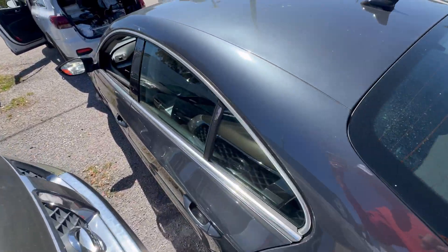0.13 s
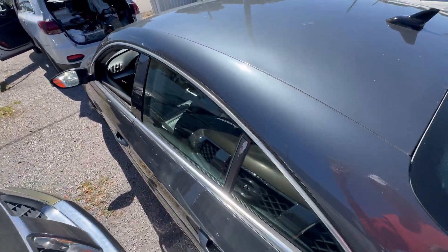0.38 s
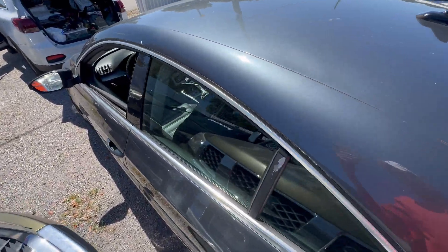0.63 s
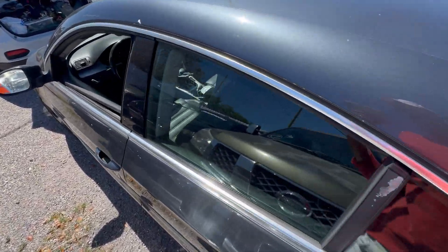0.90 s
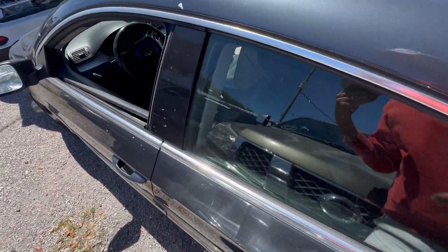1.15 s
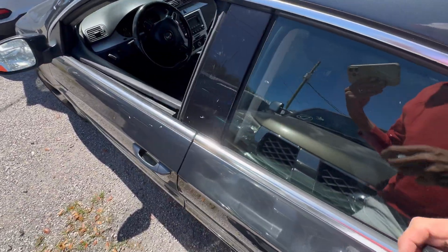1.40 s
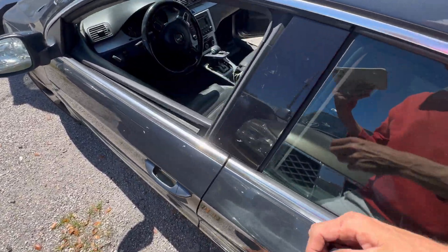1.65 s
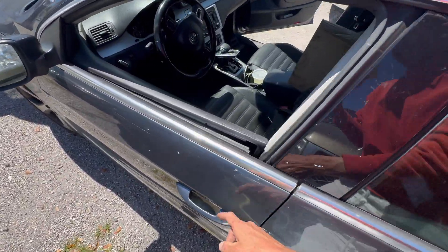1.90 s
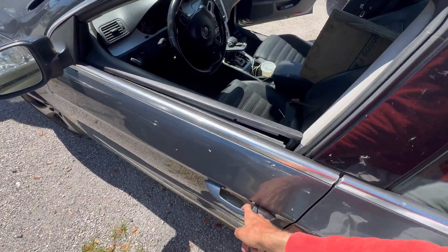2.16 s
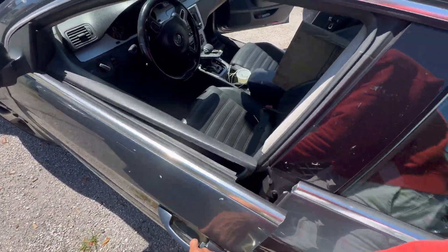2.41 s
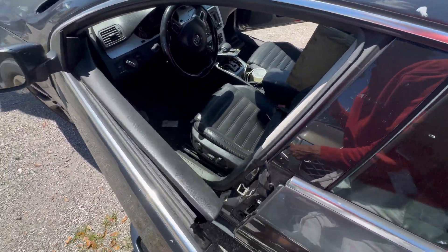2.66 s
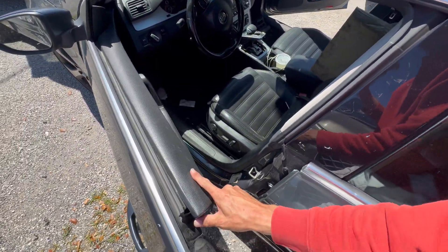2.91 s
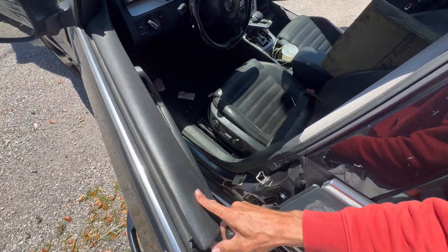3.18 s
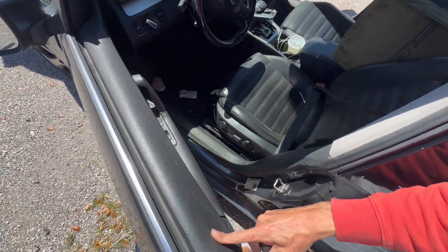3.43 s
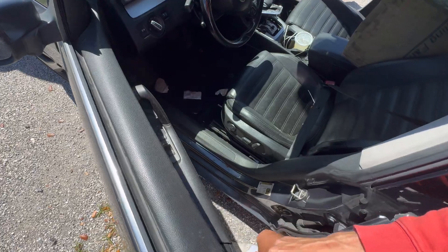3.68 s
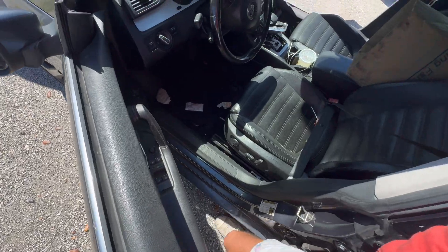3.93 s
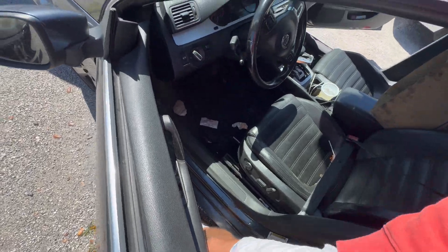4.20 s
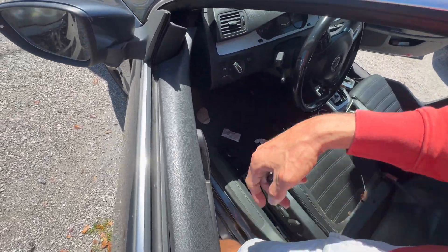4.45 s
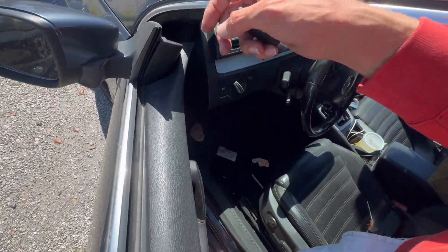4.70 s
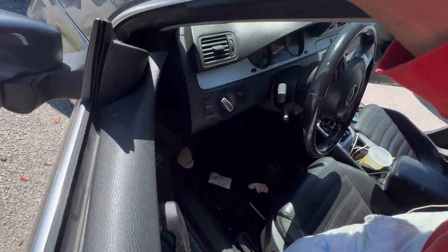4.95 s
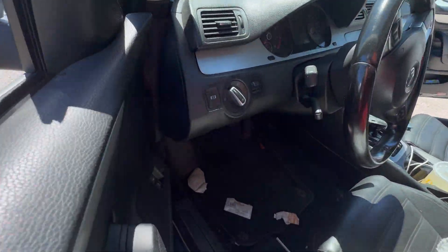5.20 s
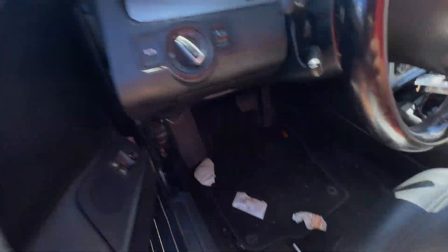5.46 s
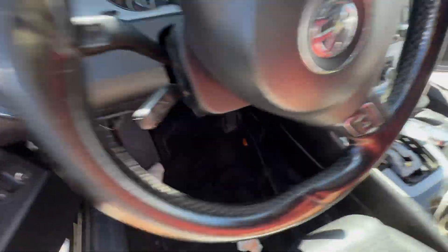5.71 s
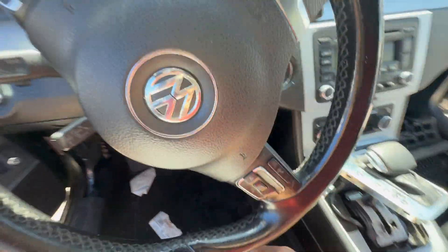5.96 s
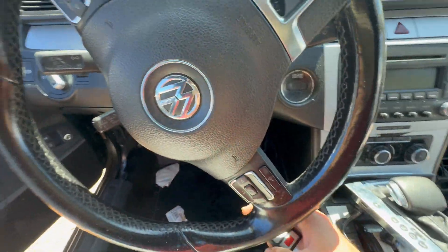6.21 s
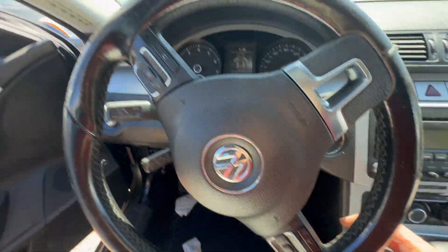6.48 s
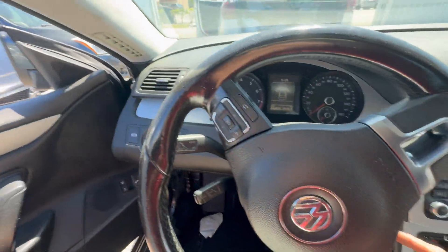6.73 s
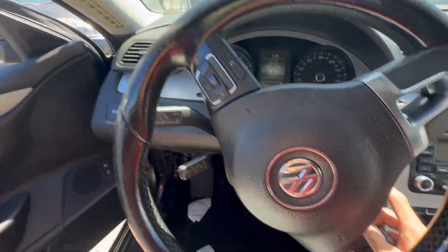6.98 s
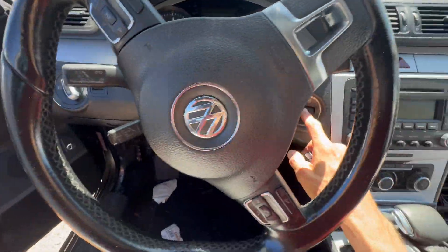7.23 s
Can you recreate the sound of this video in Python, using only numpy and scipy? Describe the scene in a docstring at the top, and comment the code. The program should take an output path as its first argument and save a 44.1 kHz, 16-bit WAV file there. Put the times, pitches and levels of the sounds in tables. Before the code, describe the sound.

A person steps over gravel with quiet crunches, fumbles at a car door handle, and pulls it open with bright metallic clicks and a solid hollow knock. More thumps of door and trim come unevenly, then clothing drags, leather rustles and the body lands in the seat. Low wind buffeting swells afterwards, with a few soft bumps and a final tiny click. Short echoes, close stereo pickup.

```python
"""A car door close to a hand-held stereo microphone: a person walks over gravel, pulls the handle, opens the door and
drops into the seat. Latch, panel and trim knock, tap and tick as decaying partials and noise cracks; the catch grinds
as noise through resonances. Shoes, clothes and seat rustle and drag as clumped grains, and a sleeve brushes mostly
the right port. Filtered noise makes the wind rumble, the buffeting and the far traffic hiss, duller by the end."""
import sys
import numpy as np
from scipy import signal
from scipy.fft import rfft, irfft, next_fast_len
from scipy.io import wavfile
from scipy.ndimage import uniform_filter1d, map_coordinates

SR = 44100
rng = np.random.default_rng(int(sys.argv[2]) if len(sys.argv) > 2 else 0)


def makeup_ratio(level_db):
    """Linear amplitude ratio for a level in decibels (20 dB per factor of ten)."""
    decades = np.asarray(level_db, float) / 20
    return 10 ** decades


def store_wav(level_fs):
    """Save 16-bit WAV to argv[1]."""
    pcm = np.round(np.clip(np.atleast_2d(level_fs), -1, 1) * 32767)
    wavfile.write(sys.argv[1], SR, pcm.T.astype(np.int16))


N = 324576  # length [samples]


def unit(x):
    """Scales to rms 1."""
    return x / np.sqrt(np.mean(x ** 2) + 1e-20)


def along(points, hz):
    """Reads (frequency [Hz], value) points on a log frequency axis."""
    f, v = np.transpose(points)
    return np.interp(np.log(hz + 1), np.log(f + 1), v)


def curves(rows):
    """One value per sample for each column after the time [s]."""
    s, *cols = np.transpose(rows)
    return [np.interp(np.arange(N) / SR, s, c) for c in cols]


def wobble(rate):
    """A smooth random curve with this many knots a second."""
    knots = rng.standard_normal(int(N * rate / SR) + 4)
    return map_coordinates(knots, [np.arange(N) * rate / SR])


def coloured(x, spectrum):
    """Filters x by a (frequency [Hz], level [dB]) spectrum and scales it to rms 1."""
    m = next_fast_len(N + SR // 4)
    gain = makeup_ratio(along(spectrum, np.fft.rfftfreq(m, 1 / SR)))
    return unit(irfft(rfft(x, m) * gain, m)[..., :N])


def diffuse(spectrum, grainy_db=0., rate=300., patchy_db=2.):
    """Stereo noise from all around, patchy in time and pitch; grainy_db makes its level flicker quickly."""
    # left-right likeness of diffuse sound: (frequency [Hz], likeness [-1..1])
    alike = [(60, 0.065), (170, 0.99), (490, -0.16), (1410, -0.15), (4030, 0.41), (11500, -0.9)]
    z = signal.stft(rng.standard_normal((2, N + 512)), nperseg=512)[2]
    field = uniform_filter1d(rng.standard_normal(z.shape[1:]), size=3, axis=0)
    field = uniform_filter1d(field, size=6, axis=1)
    patchy = signal.istft(z * makeup_ratio(patchy_db * unit(field)), nperseg=512)[1][:, :N]
    pair = patchy * makeup_ratio(grainy_db * wobble(rate))
    m = next_fast_len(N + SR // 4)
    hz = np.fft.rfftfreq(m, 1 / SR)
    # the balance of mid and side sets the likeness of the two ports
    turn = np.arccos(np.clip(along(alike, hz), -1, 1)) / 2
    shaped = rfft(pair, m) * makeup_ratio(along(spectrum, hz))
    mid, side = irfft(shaped * [np.cos(turn), np.sin(turn)], m)[:, :N]
    return unit(np.array([mid + side, mid - side]))


def add(track, sound, s, pan_db, aside=1):
    """A close sound reaches the two ports at different levels and moments; positive pan_db is louder left."""
    # arrival difference at the ports: (time [s], lag of the left port at aside=1 [ms])
    arrival = [(0, .25), (1.9, .25), (2.05, -.25), (7.36, -.25)]
    half_lag = aside * np.interp(s, *np.transpose(arrival)) * SR / 1000 / 2
    for port, sign in zip(track, (1, -1)):
        gain = makeup_ratio(sign * np.clip(pan_db, -14, 14) / 2)
        port[round(s * SR + sign * half_lag):][:len(sound)] += gain * sound


def air():
    """Wind and traffic rumble alike on both ports, lumpy buffeting pushes them apart, and the distance hisses."""
    # low rumble of wind and traffic: (time [s], level [dB])
    rumble_level = [(0, -52), (0.39, -58), (0.415, -38), (1.11, -46), (1.7, -40), (2.0, -41), (2.45, -32.5),
                    (2.66, -40), (3.07, -36), (4.32, -38), (4.49, -45), (4.65, -37), (5.35, -37),
                    (5.76, -31.5), (6.09, -30.5), (6.35, -38), (7.36, -39.5)]
    # wind pushing the two ports apart: (time [s], level before the port gains [dB])
    buffet_level = [(0, -52), (0.5, -76), (0.85, -38), (1.6, -74), (2.3, -32), (2.65, -49), (3.3, -31),
                    (3.7, -35), (3.9, -61), (4.4, -45.5), (4.75, -37.5), (5.3, -32.5), (5.9, -25),
                    (6.12, -25), (6.35, -48.5), (7.36, -56)]
    # far traffic and yard: (time [s], bright hiss as outside [dB], dull hiss as in the cabin [dB])
    far_level = [(0, -51.5, -56), (.85, -53, -44), (1.1, -82, -79), (4.5, -79, -67.5), (6, -70.5, -65),
                 (7.36, -72, -46)]
    # spectra: (frequency [Hz], relative level [dB])
    rumble_spectrum = [(22, -58.5), (38, 6), (55, 5.5), (85, 4), (115, -6.5), (200, -12.5), (300, -78)]
    gust_spectrum = [(25, -29), (45, -19), (65, 9), (100, 8), (160, -2), (280, -21), (500, -51.5)]
    outside_spectrum = [(1500, -20.5), (2500, -9), (4000, -3), (4600, 8.5), (5400, 7), (6500, 1.5),
                        (9500, -8), (11500, 0.5)]
    inside_spectrum = [(300, -24.5), (900, 9.5), (1600, 11.5), (2300, 4.5), (3000, -7.5), (10000, -38),
                       (11500, -38.5)]

    uneven = rng.standard_normal(N) * makeup_ratio(wobble(15))
    rumble = makeup_ratio(curves(rumble_level)[0]) * coloured(uneven, rumble_spectrum)
    lumps = makeup_ratio(5.0 * wobble(13)) * coloured(rng.standard_normal(N), gust_spectrum)
    buffet = makeup_ratio(curves(buffet_level)[0]) * unit(lumps) * [[1.1], [-.9]]  # opposite signs on the ports
    outside_db, inside_db = curves(far_level)
    outside = makeup_ratio(outside_db) * diffuse(outside_spectrum, patchy_db=3)
    inside = makeup_ratio(inside_db) * diffuse(inside_spectrum, patchy_db=3)
    return rumble + buffet + outside + inside


def rustle():
    """Gravel, cloth and leather stir in clumped grains: a low body, a crackle and a fine swish."""
    # stirring of shoes, clothes and seat: (time [s], level before clumping [dB])
    stir = [(0, -45), (0.3, -53), (0.8, -44), (0.95, -45), (1.95, -45), (2.13, -37.5), (2.42, -34.5),
            (2.62, -42), (3.15, -41.5), (3.6, -45), (4.0, -40), (4.63, -36.5), (4.85, -32), (5.35, -35.5),
            (5.62, -40.5), (5.9, -41.5), (6.2, -45), (6.65, -45.5), (6.9, -55.5), (7.36, -49.5)]
    # fine swish: (time [s], level before clumping [dB])
    fine = [(0, -57), (0.45, -53), (1.1, -55.5), (1.6, -50.5), (2.0, -55.5), (2.3, -50), (2.7, -59.5),
            (3.45, -54.5), (3.8, -64), (4.2, -55.5), (4.6, -57.5), (4.95, -39), (5.2, -42.5), (5.55, -46),
            (5.7, -59), (5.9, -51), (6.5, -57.5), (6.9, -69.5), (7.36, -57.5)]
    # spectra: (frequency [Hz], relative level [dB])
    body_spectrum = [(70, -8), (130, -1.5), (250, 0.5), (550, -4), (800, -22), (1200, -80)]
    crackle_spectrum = [(350, -22), (600, 3), (1000, 3.5), (1800, -2.5), (2600, -11.5), (4000, -23)]
    swish_spectrum = [(1800, -37), (2600, -1.5), (4500, 0.5), (7000, -8.5), (9500, 2), (11500, -10)]

    (stir_db,), (swish_db,) = curves(stir), curves(fine)
    quiet_db = -50.5
    # 1.5 dB under the body at quiet stirring; swings 0.95 dB per dB of body
    crackle_db = quiet_db - 1.5 + 0.95 * (stir_db - quiet_db)
    clumps = wobble(35)
    body = makeup_ratio(stir_db + 1.0 * clumps) * diffuse(body_spectrum, grainy_db=-0.5, rate=53, patchy_db=4.0)
    crackle = makeup_ratio(crackle_db + 1.8 * clumps) * diffuse(crackle_spectrum, grainy_db=1.0, rate=230, patchy_db=4.0)
    swish = makeup_ratio(swish_db + 2.4 * clumps) * diffuse(swish_spectrum, grainy_db=2, rate=400, patchy_db=4)
    return body + crackle + swish


def scuffs():
    """Shoes on gravel and cloth on leather drag for a moment: coarse band-limited grains under a swell."""
    # short drags: (time [s], length [s], level [dB], middle of band [Hz], left-right [dB])
    drags = [(0.406, 0.09, -40, 397, -1), (0.693, 0.08, -41, 875, -10), (0.767, 0.075, -40.5, 765, -4),
             (0.952, 0.07, -41.5, 920, 2), (1.325, 0.12, -36.5, 774, -1), (1.732, 0.045, -41.5, 895, 3),
             (1.785, 0.068, -35.5, 1050, -1.5), (2.099, 0.044, -29.5, 990, -3), (2.285, 0.11, -30, 785, 0),
             (2.38, 0.098, -33.5, 323, -4), (2.485, 0.017, -30, 903, -3), (2.672, 0.047, -38.5, 656, 9),
             (3.043, 0.045, -45, 1120, 5), (3.155, 0.031, -48, 900, 2), (3.385, 0.035, -39.5, 600, -1),
             (4.836, 0.075, -27, 289, -3), (4.899, 0.03, -28.5, 810, -1.5), (5.012, 0.079, -41, 300, -2),
             (5.182, 0.029, -35, 1060, 14), (5.3, 0.02, -31.5, 1180, -7), (5.311, 0.022, -25.5, 1100, 8.5),
             (5.33, 0.03, -26, 780, -4), (5.634, 0.1, -51, 1110, 8), (5.878, 0.06, -43.5, 800, 5)]
    spread = 2.27  # the band reaches this factor below and above its middle
    track = np.zeros((2, N + SR))
    for s, length, db, hz, pan_db in drags:
        u = np.arange(round(length * SR)) / (length * SR)
        knots = rng.standard_normal(int(length * 300) + 4)  # 300 a second
        grains = rng.standard_normal(len(u)) * makeup_ratio(5.5 * map_coordinates(knots, [u * length * 300]))
        band = signal.butter(4, [hz / spread, hz * spread], "band", fs=SR, output="sos")
        swell = np.sin(np.pi * u ** 0.71) ** 0.7
        add(track, makeup_ratio(db) * swell * unit(signal.sosfilt(band, grains)), s, pan_db)
    return track[:, :N]


def echo(x):
    """The neighbouring cars and the cabin answer with noise tails, each frequency dying at its own speed."""
    # echo of car sides and cabin: (frequency [Hz], t60 [s])
    decay = [(200, 0.11), (2000, 0.13), (10000, 0.031)]
    hz, t, z = signal.stft(rng.standard_normal((2, SR // 3)), SR, nperseg=256)
    tail = signal.istft(z * makeup_ratio(-60 * t / along(decay, hz)[:, None]), SR, nperseg=256)[1]
    tail = tail / np.linalg.norm(tail[0])
    later = np.pad(x, ((0, 0), (200, 0)))  # a short way there and back, 200 samples
    return signal.fftconvolve(later, tail, axes=1)[:, :N]


def knocks():
    """Each dull blow swells for a moment, rings briefly with a rough edge, and shakes the door panel."""
    # blows: (time [s], level [dB], nominal pitch [Hz], door panel against the blow [dB], left-right [dB])
    blows = [(0.418, -30, 370, -9, -3), (0.778, -29, 1040, -1.5, 2), (1.13, -30, 676, -5, -3),
             (1.332, -23, 590, -11, -9), (1.345, -27.5, 223, -14, -1), (1.356, -24.5, 670, -11, -7),
             (1.399, -24.5, 784, -9, -1), (1.462, -26.5, 500, -9, -4), (1.7, -23.5, 290, -5, -3),
             (2.104, -24, 750, -7, -8), (2.115, -21.5, 766, -24, -16), (2.133, -15.5, 566, -27, -6),
             (2.286, -14.5, 367, 5.5, 14), (2.315, -11, 225, 0, -2), (2.348, -12, 460, -1.5, 1),
             (2.362, -16, 187, -5, 0), (2.42, -19.5, 302, 1, -3), (2.496, -8.5, 852, -12, 15),
             (2.5075, -7, 231, -1, -5), (2.672, -22.5, 450, 0, -7.5), (2.906, -14, 259, -5.5, -2),
             (2.929, -28.5, 583, -3, -1), (3.035, -15, 243, -13, -1), (3.049, -20, 201, -2.5, -5),
             (3.223, -22, 560, -16, -4.5), (3.41, -19, 475, -17, -2), (3.879, -12, 265, -8, 0),
             (4.028, -25, 643, -4, 15), (4.2, -26, 500, -12, -1), (4.216, -22.5, 516, -16, -1),
             (4.2673, -8.5, 492, -19, -3.5), (4.279, -14.5, 305, -9, -3), (4.34, -19, 773, -7, 3),
             (4.651, -19.5, 470, -18, -4), (4.8255, -6, 510, -15, -1), (4.909, -13.5, 430, -8, 11),
             (4.933, -13.5, 247, -33, -3), (5.076, -17, 348, -32, 0), (5.443, -27.5, 240, 7, 0.5),
             (5.518, -26, 231, 2, -8), (5.556, -40, 270, 10, -1), (5.744, -42, 232, 10, 3),
             (5.909, -30, 570, -17, 7), (6.07, -44, 235, 6, 11), (6.14, -33, 231, 6.5, 0),
             (6.236, -36, 534, -2, -6), (7.206, -31, 790, -11, 2.5)]
    # door panel modes: (frequency [Hz], mean relative level [dB], t60 [s])
    modes = [(125.5, -1, 0.13), (187.7, -2, 0.14), (231, 1.5, 0.073), (341.7, -10, 0.12), (408.3, -7, 0.1),
             (560, -10, 0.09)]
    track, t = np.zeros((2, N + SR)), np.arange(SR // 3) / SR
    for s, db, hz, panel_db, pan_db in blows:
        # blows that barely shake the panel ring shorter
        fade_t60 = 15 * makeup_ratio(0.35 * panel_db) / hz + 0.015
        fade = makeup_ratio(-60 * t / fade_t60) * (1 - np.exp(-t * hz)) ** 2
        # the pitch sags by 0.22 of its nominal value as the blow settles
        cycles = np.cumsum(hz * (1 + 0.22 * (np.exp(-t * hz / 2.18) - 0.4))) / SR
        hard = min(hz / 700, 1)  # blows below 700 Hz are softer, with weaker overtones and edge
        ring = 0
        # unrelated partials make the ring uneven; the higher ones die sooner
        for ratio, gain in [(1, 1), (1.3, 0.47), (1.9, 0.78), (3.1, 0.31)]:
            overtone = ratio > 1
            phase = rng.random() * overtone
            partial = np.sin(2 * np.pi * (cycles * ratio + phase))
            ring = ring + gain * hard ** overtone * makeup_ratio(-60 * t * ratio / 0.059) * partial
        edge = signal.butter(2, [hz * 0.5, hz * 2.76], "band", fs=SR, output="sos")
        rough = 0.31 * hard * unit(signal.sosfilt(edge, rng.standard_normal(len(t))))
        panel = 0
        for f, level, ring_s in modes:
            mode_db = level + 2 * rng.standard_normal()  # each blow excites the modes unevenly
            panel = panel + makeup_ratio(mode_db - 60 * t / ring_s) * np.sin(2 * np.pi * f * t)
        panel = panel * (1 - np.exp(-t / 0.0081))
        add(track, makeup_ratio(db) * fade / fade.max() * (ring + rough), s, pan_db)
        track[:, round(s * SR):][:, :len(t)] += makeup_ratio(db + panel_db) * panel  # long waves reach both ports alike
    return track[:, :N]


def taps():
    """A small hard part is struck once: a few cycles that sag in pitch."""
    # handle, catch and buckle parts: (time [s], level [dB], nominal pitch [Hz], left-right [dB])
    strikes = [(1.3288, -40, 910, -9), (1.7873, -33, 1410, -3), (1.8117, -32, 905, -2),
               (1.828, -34, 1830, 10), (2.1063, -27, 1100, -9), (2.1160, -19, 2080, -1),
               (2.1344, -19, 1860, -3.5), (2.2746, -29, 2900, 2), (2.2847, -11.5, 4470, 0),
               (2.329, -28, 3280, 3), (2.3470, -13.5, 3430, 4), (2.931, -36, 824, 0),
               (3.269, -28, 1600, -4), (4.2653, -17.5, 945, 10), (4.3417, -20, 930, 5),
               (4.8243, -14, 904, 1), (5.0963, -29, 1500, -5), (5.1975, -32, 1720, -4),
               (5.301, -28, 1370, -4), (5.312, -18, 1900, -3), (5.3157, -19, 1680, -8),
               (5.337, -22, 890, 0), (5.3435, -21, 680, -9), (5.911, -31, 3000, 8)]
    track, t = np.zeros((2, N + SR)), np.arange(SR // 10) / SR
    for s, db, hz, pan_db in strikes:
        turn, near = rng.random(2)  # starting phases
        life = 5.6 / hz + 0.0043  # t60 of the fade [s]
        fade = makeup_ratio(-60 * t / life) * (1 - np.exp(-t * hz)) ** 2
        cycles = np.cumsum(hz * (1 + 0.27 * (np.exp(-t / (0.22 * life)) - 0.6))) / SR
        ring = np.sin(2 * np.pi * (cycles + turn)) + 0.092 * np.sin(2 * np.pi * (2.1 * cycles + near))
        add(track, makeup_ratio(db) * fade / fade.max() * ring, s, pan_db, aside=0.34)  # nearly straight ahead
    return track[:, :N]


def ticks():
    """Hard small parts click: a noise crack that dies fast, with a duller lower edge."""
    # latch, trim and buckle: (time [s], level [dB], lower edge against the crack [dB], left-right [dB])
    clicks = [(1.679, -48, -11, -12), (2.043, -46, 2, 1.5), (2.172, -30.5, 0.5, -3.5),
              (2.2841, -31.5, 14.5, -10.5), (2.3425, -28, 9.5, 8), (2.345, -34, 3.5, 11),
              (2.4865, -35, 7, 6), (2.4955, -19.5, 9.5, 2), (3.037, -44.5, 3.5, -4.5),
              (3.059, -34.5, -9, -5), (3.224, -40.5, -6.5, 0), (3.686, -33.5, -0.5, 0.5),
              (3.786, -38, 3, 1.5), (4.056, -42, 9, 4), (4.2652, -36, 9.5, -7), (4.338, -41, 9.5, 10.5),
              (4.731, -52, 22, 4.5), (4.822, -42, 10, 16), (4.9068, -38, 9.5, -17),
              (5.0154, -41, 5.5, -6.5), (6.009, -40, -11, -3), (6.1772, -33.5, -0.5, 0),
              (6.2384, -43, 7.5, 8.5), (7.335, -43.5, 9, 0)]
    # spectra: (frequency [Hz], relative level [dB])
    dull_spectrum = [(1200, 6.5), (2200, 0.5), (5000, -3), (6500, -25)]
    bright_spectrum = [(4500, -29), (5800, 12.5), (7200, -4.5), (9500, 6), (11200, 1.5), (12500, -50)]
    track, t = np.zeros((2, N + SR)), np.arange(SR // 4) / SR
    dull = coloured(rng.standard_normal(N), dull_spectrum)
    bright = coloured(rng.standard_normal(N), bright_spectrum)
    slow = makeup_ratio(-60 * t / 0.04) * (1 - np.exp(-t / 0.0013))
    fast = makeup_ratio(-60 * t / 0.013) * (1 - np.exp(-t / 0.00046))
    for s, db, edge_db, pan_db in clicks:
        k = min(round(s * SR), N - len(t))
        crack = bright[k:k + len(t)] + makeup_ratio(edge_db) * dull[k:k + len(t)]
        add(track, makeup_ratio(db) * (slow + fast) * crack, s, pan_db)
    return track[:, :N]


def latch():
    """The catch grinds free: dense metal grains ringing in its small parts."""
    # grinding: (time [s], level [dB])
    grind = [(2.275, -48), (2.281, -35.5), (2.341, -31.5), (2.43, -57.5)]
    # small parts of the catch: (resonance [Hz], width [Hz], relative level [dB])
    catch = [(2170, 340, -3), (3230, 880, -0.5), (4730, 490, 1.5), (6400, 530, -6.5), (9200, 1200, -5.5)]
    start, end = (grind[0][0] - .01, -90), (grind[-1][0] + 0.027, -90)
    level_db, = curves([start] + list(grind) + [end])
    grains = rng.standard_normal((2, N)) * makeup_ratio(2.5 * wobble(250))
    m = next_fast_len(N + SR // 4)
    f = np.fft.rfftfreq(m, 1 / SR)
    parts = 0
    for k, (centre, width, db) in enumerate(catch):
        resonance = 1j * f * width / (centre * centre - f * f + 1j * f * width)
        parts = parts + (-1) ** k * makeup_ratio(db) * resonance  # neighbours in opposite phase
    return makeup_ratio(level_db) * unit(irfft(rfft(grains, m) * parts, m)[:, :N])


def sleeve():
    """Fibres slip over the ports, far louder on the right, in short squeaky grains, and one of them snaps."""
    # strokes: (firmest contact [s], level before the port gains [dB], approach [dB/s], release [dB/s])
    strokes = [(4.69, -48, 59, 199), (4.83, -55.5, 300, 60), (4.97, -36.5, 151.5, 163.5),
               (5.016, -24.5, 297.5, 702)]
    # a fibre snapping: (time [s], peak before the port gains [dB], frequency [Hz])
    snapping = (5.0175, -6.5, 9450)
    # brushing spectrum: (frequency [Hz], relative level [dB])
    brush_spectrum = [(7300, -27), (8000, -13), (9200, -9), (10300, -6), (11200, -15.5), (12200, -27)]
    # contact: (first touch [s], last touch [s])
    first, last = (4.55, 5.2)

    now = np.arange(N) / SR
    press = sum(makeup_ratio(db - np.where(now < s, rise * (s - now), fall * (now - s))) for s, db, rise, fall in strokes)
    press = press * np.clip(np.minimum(now - first, last - now) / 0.029, 0, 1)
    fibres = coloured(rng.standard_normal(N) * makeup_ratio(2.5 * wobble(600)), brush_spectrum)
    s, snap_db, snap_hz = snapping
    t = now - s
    snap = makeup_ratio(snap_db) * np.exp(-(t / 0.00042) ** 2) * np.cos(2 * np.pi * snap_hz * t)
    return (press * fibres + snap) * makeup_ratio([[-10], [4.5]])  # left, right port gains [dB]


def scene():
    """Close blows, clicks and scuffs with their echo, over rustle, sleeve and air."""
    close = knocks() + ticks() + latch() + scuffs()
    hard = taps()
    answer = makeup_ratio(-10) * echo(close + hard)
    return close + hard + answer + rustle() + sleeve() + air()


def top_cut(x):
    """Nothing passes above the cut-off."""
    return signal.sosfilt(signal.butter(12, 12140, fs=SR, output="sos"), x)


def record(dry):
    """The microphone fades above 11 kHz and the camera rounds off the highest peaks."""
    dull = signal.sosfilt(signal.butter(8, 11000, fs=SR, output="sos"), dry)
    soft = dull / (1 + np.abs(dull) ** 6) ** (1 / 6)
    return top_cut(soft)


dry = scene()
out = record(dry)
store_wav(out)
```